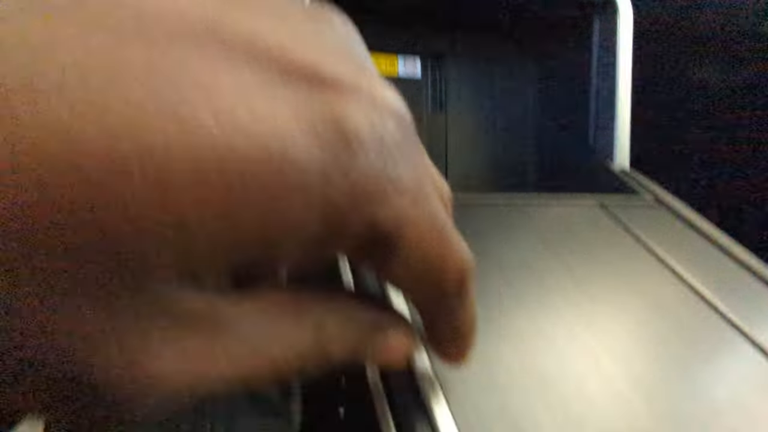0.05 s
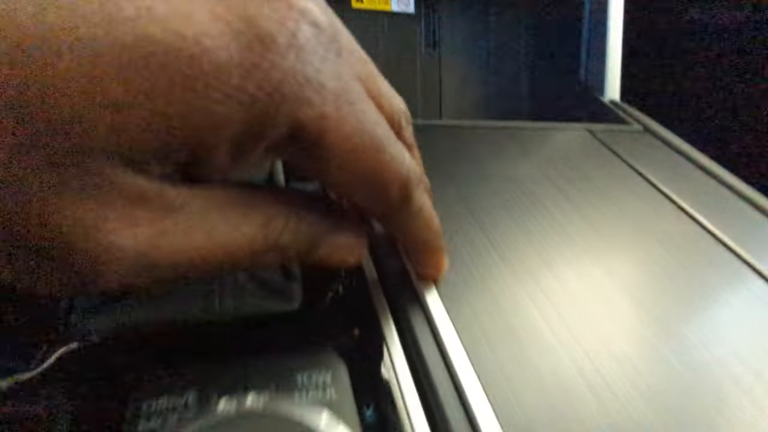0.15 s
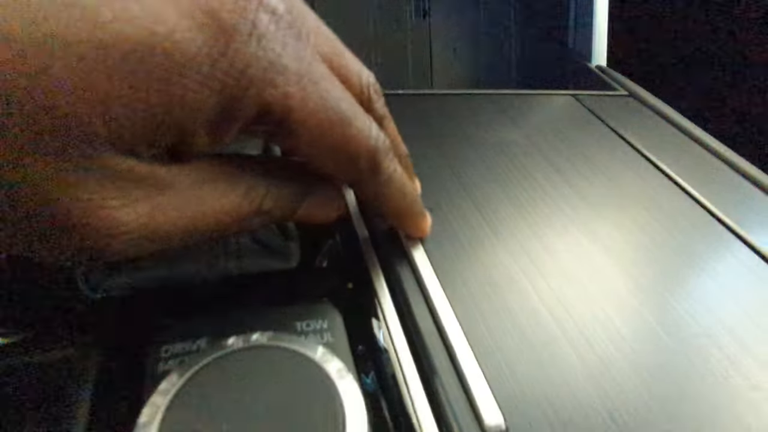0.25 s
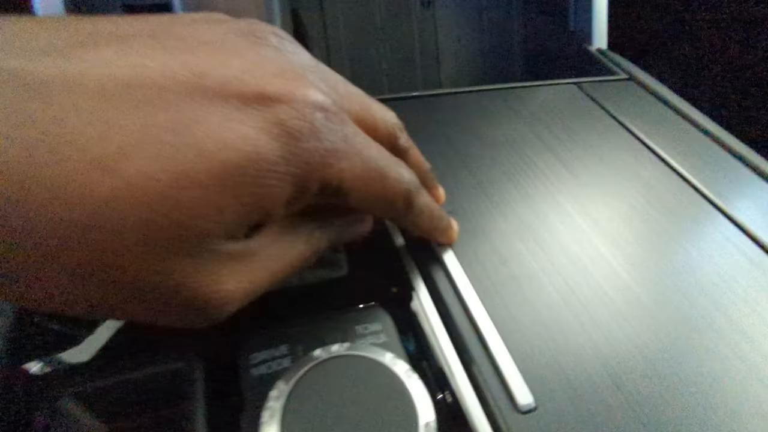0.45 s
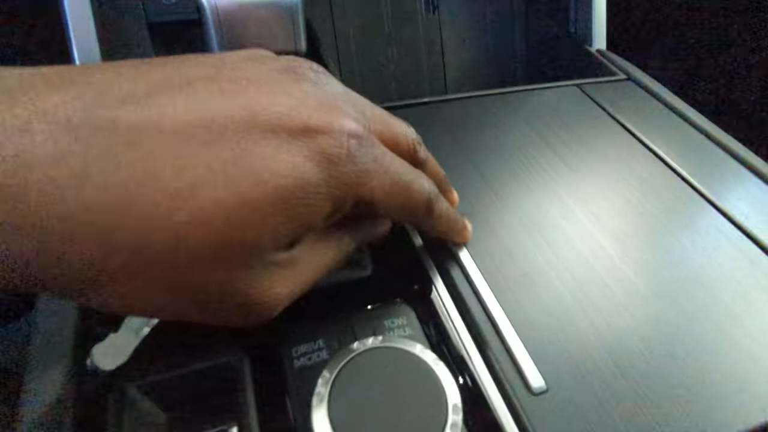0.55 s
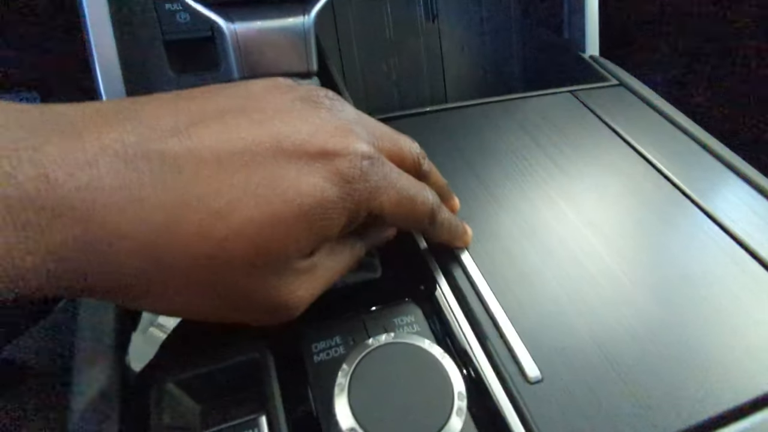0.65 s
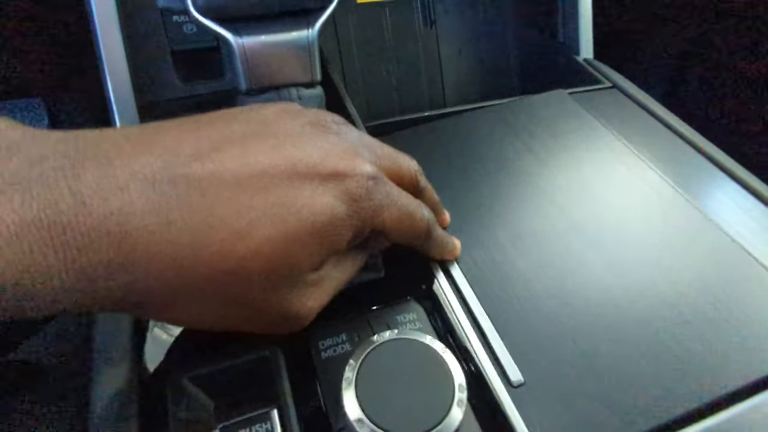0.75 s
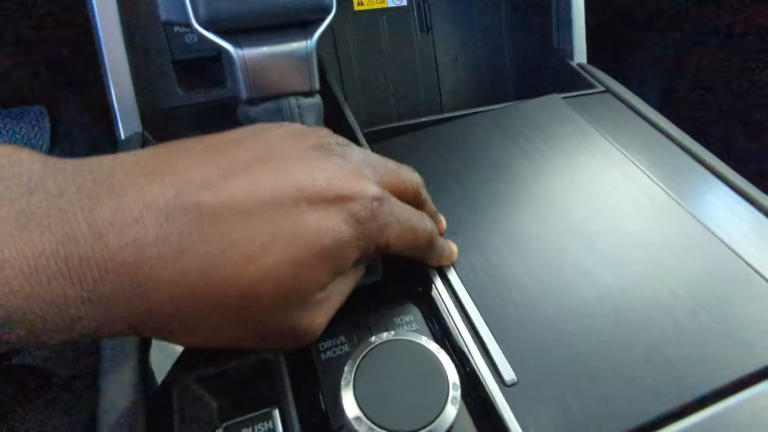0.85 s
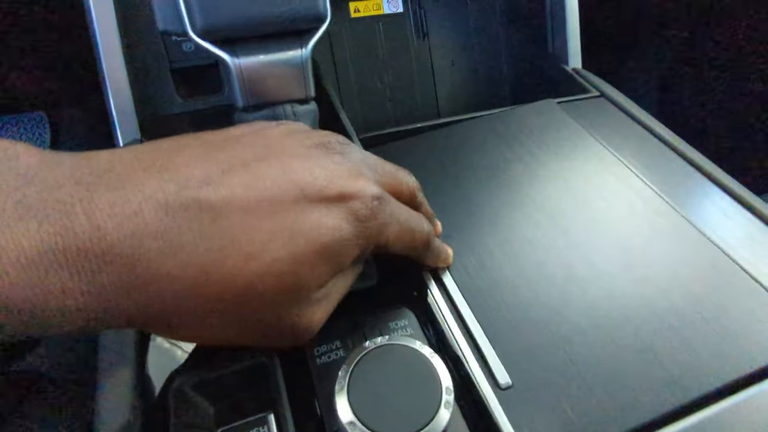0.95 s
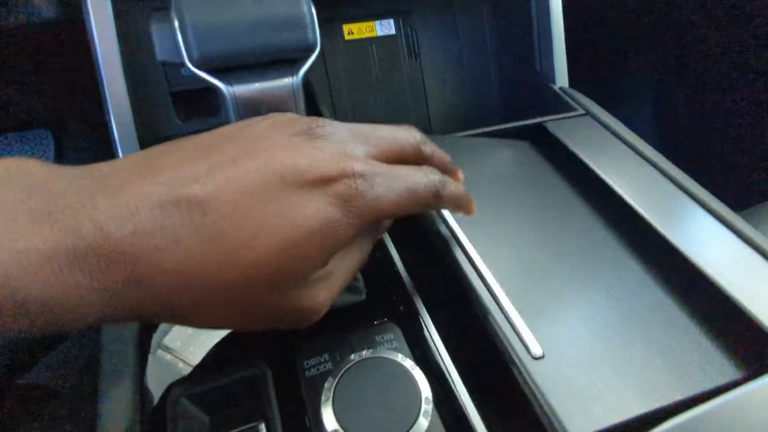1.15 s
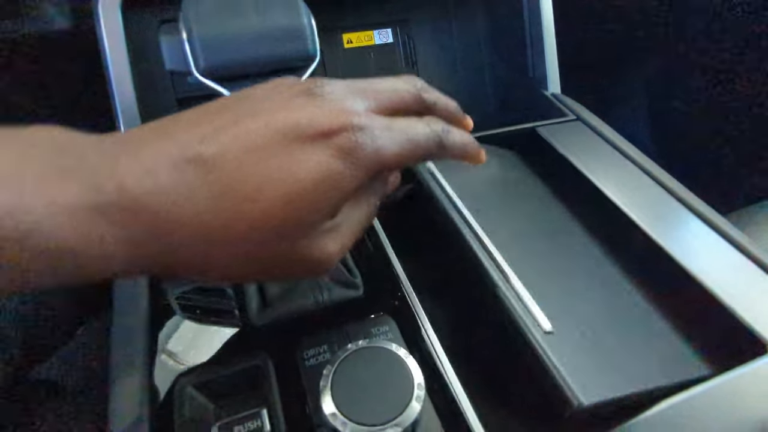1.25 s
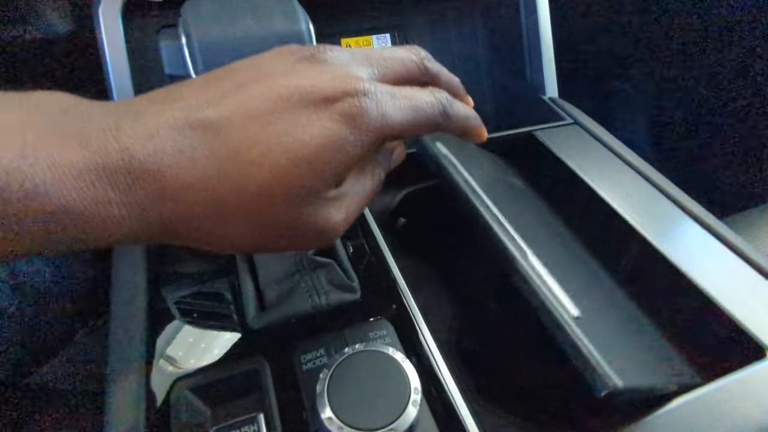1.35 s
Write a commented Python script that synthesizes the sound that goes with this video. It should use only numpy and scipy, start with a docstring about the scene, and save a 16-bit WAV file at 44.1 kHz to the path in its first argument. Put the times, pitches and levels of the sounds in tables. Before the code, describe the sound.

A plastic console cover is pushed until it lets go with a hollow clack and glides open. Before that, a hand brushes it and sharp knocks hit the microphone on the right. Close, inside a parked car with faint ventilation.

```python
"""A plastic console cover, heard from close by inside a parked car: a hand brushes over it and pushes
until the catch lets go with a hollow clack, then the cover glides open on a grain of tiny slips.
Before the clack, something knocks and clicks right at the right-hand microphone, probably the grip
on the recorder, and the cabin rings briefly. Ventilation hums faintly behind it all."""
import sys
import numpy as np
from scipy import signal
from scipy.fft import rfft, irfft
from scipy.io import wavfile
from scipy.ndimage import uniform_filter1d

SR = 44100
rng = np.random.default_rng(int(sys.argv[2]) if len(sys.argv) > 2 else 0)


def dump_mix(stems):
    """Bounce the given channels to the path in sys.argv[1] as a 16-bit WAV at rate SR."""
    frames = np.atleast_2d(stems).T  # one column per channel
    limited = np.clip(frames, -1, 1)  # hard clip at full scale
    pcm = np.round(limited * 32767).astype(np.int16)
    wavfile.write(sys.argv[1], SR, pcm)


N = 61739


def catch():
    """The catch lets go: quick blows rattle the cover and boom in the console, then the cover lurches."""
    # catch and cover hitting their stops: start_s, body_db, rattle_db
    blows = [(0.7829, -55.5, -46), (0.7927, -39, -47.5), (.8080, -48.5, -42.5), (0.8133, -45, -47.5),
             (0.8159, -45.5, -74), (0.827, -49, -63), (0.839, -48.5, -57.5)]
    # hollow body of the console: pitch_hz, gain_db, t60_s
    body_modes = [(184.7, 3, 0.11), (207, 10, 0.066), (254, -3.5, 0.11), (340, -6, 0.11),
                  (642, -6.5, 0.076), (890, -13, 0.063)]
    # spectrum of the rattling cover: frequency_hz, gain_db
    rattle_colour = [(150, -0.5), (400, 3.5), (1000, -0.5), (1500, -10), (2400, -6), (3600, -17.5),
                     (5000, -24), (8500, -47), (15000, -50)]
    # the freed cover lurching on its runners: pitch_hz, level_db, t60_s
    lurch_modes = [(59.6, -43, 0.15), (100, -39, .085), (130, -46, .08)]
    # bright tick as the catch slips: frequency_hz, gain_db
    snap_colour = [(1000, -1), (3000, 2), (5000, -2.5), (7000, -1), (9000, -3.5), (12000, -5), (16000, -3)]
    snap_s, lurch_s = 0.8118, 0.823
    body_attack_s, cover_attack_s = 0.0043, 0.00042
    clack, rattle = np.zeros(N), noise(rattle_colour)[0]
    for start, body_db, rattle_db in blows:
        clack += undb(body_db) * rise(start, body_attack_s) * ring(start, body_modes)
        clack += undb(rattle_db) * rise(start, cover_attack_s) * rattle * fade(start, t60=0.06)
    clack += rise(lurch_s, body_attack_s) * ring(lurch_s, lurch_modes)
    snap = undb(-45) * noise(snap_colour) * rise(snap_s, cover_attack_s) * fade(snap_s, t60=0.042)
    return clack * undb([[-2.2], [0]]) + snap  # the clack sits a little to the right


def brush():
    """Skin on finely textured plastic: a high, fluttering hiss, a little to the left."""
    # the hand's stroke over the cover: time_s, level_db
    stroke = [(0, -57.5), (.03, -51.5), (.084, -45.5), (.15, -50), (.206, -49), (.25, -46.5), (.29, -48.5),
              (.33, -54), (.384, -73), (.584, -79.5), (.63, -62.5), (.692, -60.5), (.79, -62), (.86, -66),
              (.96, -79), (1.214, -88), (1.33, -75), (1.4, -85)]
    # spectrum of the hiss: frequency_hz, gain_db
    hiss_colour = [(500, -35), (2000, -12), (3500, -9), (5000, -13), (6700, -3.5), (8200, -7.5),
                   (10000, -2), (12300, 0), (14000, 0.5), (16000, -2.5)]
    pan = undb([[1.5], [-1.5]])
    return pan * noise(hiss_colour) * curve(stroke) * undb(2 * walk(rate_hz=70.7))


def slide():
    """Dense tiny slips of the sliding surfaces sound through the cover."""
    # cover and hand sliding: time_s, level_db
    travel = [(0, -55.5), (.035, -47.5), (.07, -57), (.16, -56), (.22, -57), (.33, -56.5), (.42, -65),
              (.58, -61), (.65, -57), (.76, -57.5), (.92, -56), (1.0, -66.5), (1.05, -64.5), (1.13, -59.5),
              (1.2, -64), (1.26, -69), (1.4, -90)]
    # spectrum of the slips through the cover: frequency_hz, gain_db
    slip_colour = [(80, 6.5), (250, -1), (550, -3.5), (950, 0.5), (1300, -3), (2100, -6), (3200, -12),
                   (5000, -24.5), (9000, -30), (16000, -63)]
    slips_per_s, spread_db = 2500, 2.5
    slips = (rng.random((2, N)) < slips_per_s / SR) * rng.standard_normal((2, N))
    slips *= undb(spread_db * rng.standard_normal((2, N)))
    return colour(slips, slip_colour) * curve(travel)


def rubs():
    """Brief rubs each sound one narrow resonance of the cover."""
    # rubs on the cover: centre_s, width_s, pitch_hz, level_db
    touches = [(0.033, 0.016, 610, -55), (1.115, 0.024, 810, -64.5), (1.194, 0.019, 507, -59)]
    bandwidth_hz = 65
    out = np.zeros((2, N))
    for centre, width, hz, db in touches:
        edges_hz = [hz - bandwidth_hz / 2, hz + bandwidth_hz / 2]
        band = signal.butter(1, edges_hz, "band", fs=SR, output="sos")
        rub = signal.sosfilt(band, rng.standard_normal((2, N)))
        out += undb(db) * swell(centre, width) * rub / rub.std()
    return out


def knocks():
    """Heavily damped thuds of a cycle or two, each with a little contact grit."""
    # knocks at the right microphone: start_s, level_db, pitch_hz, swell_cycles, grit_gain_db
    hits = [(0.227, -18, 422, 0.42, -10.5), (0.2321, -11, 193, 0.37, -25.5), (0.2491, -13.5, 483, 0.71, -6),
            (.2521, -14, 900, 0.44, -23.5), (.2572, -23.5, 706, 0.7, -12.5), (0.3539, -33.5, 820, 0.34, -5),
            (0.6236, -32.5, 1270, 0.57, -11), (0.624, -34, 417, 0.4, -16), (.7000, -44, 1100, 0.37, -1),
            (0.7119, -32.5, 360, 0.28, -15), (0.7139, -36, 780, 0.37, -15)]
    # spectrum of the contact grit: frequency_hz, gain_db
    grit_colour = [(60, -6), (150, -12), (500, 1.5), (1400, -1.5), (2400, -6.5), (3200, -15), (5000, -22),
                   (9000, -50), (16000, -58)]
    out, grit = np.zeros(N), noise(grit_colour)[0]
    for start, db, hz, swell_cycles, grit_db in hits:
        cycles = clock(start) * hz
        envelope = cycles / swell_cycles * np.exp(1 - cycles / swell_cycles)
        thud = envelope * np.sin(2 * np.pi * cycles)
        thud -= envelope * thud.sum() / envelope.sum()  # the air returns to rest
        contact = undb(grit_db) * grit * rise(start, 0.00045) * fade(start, t60=0.024)
        out += undb(db) * (thud + contact)
    return out


def clicks():
    """Hard contacts: a short crack and the brief ring of stiff plastic."""
    # sharp clicks among the knocks: start_s, gain_db, crack_gain_db
    contacts = [(0.227, -40, -6), (0.2401, -23, -26), (0.2514, -28, -4.5), (0.2515, -17.5, -1.5),
                (0.2543, -26.5, -10), (0.2588, -27, -6)]
    # resonances of the stiff plastic: pitch_hz, gain_db, t60_s
    plastic_modes = [(1580, -24.5, 0.054), (2580, -10.5, 0.04), (3300, -25, 0.033), (4390, 3.5, 0.0065),
                     (4820, 4.5, 0.0061), (6620, -12, 0.024), (6700, -31, 0.0099)]
    # spectrum of the crack: frequency_hz, gain_db
    crack_colour = [(300, -19), (1500, 5), (2500, -27), (3300, 7), (4500, 8), (6500, 6), (8000, -8),
                    (11000, -9), (16000, -19)]
    out, crack_noise = np.zeros(N), noise(crack_colour)[0]
    for start, db, crack_db in contacts:
        crack = undb(crack_db) * crack_noise * fade(start, t60=0.012)
        out += undb(db) * rise(start, 0.00011) * (ring(start, plastic_modes) + crack) / 2
    return out


def handling():
    """Knocks, clicks and grip rumble reach the right microphone directly; both sides hear the cabin."""
    # ring of the cabin after a knock: frequency_hz, gain_db
    tail_colour = [(40, -13), (80, -5), (200, -0.5), (400, -9.5), (1000, -11), (2500, 4), (4400, 4.5),
                   (5400, 4), (6500, -3), (9000, -11.5), (16000, -10)]
    # dull rumble as the grip shifts: frequency_hz, gain_db
    grip_colour = [(25, -14), (60, 21), (130, -9), (260, -28), (500, -32), (1500, -41), (8000, -65)]
    direct = knocks() + clicks()
    response = noise(tail_colour) * fade(0, t60=0.15)
    response /= np.sqrt(np.sum(response ** 2, axis=1, keepdims=True))
    out = signal.fftconvolve(direct[None], response, axes=1)[:, :N] * undb([[-24.5], [-16.5]])
    rumble = undb(-46) * noise(grip_colour)[0] * swell(centre_s=0.2, width_s=0.014)
    out[1] += direct + rumble
    # the heaviest knock sets off a low cabin resonance
    boom_s, boom_hz, boom_db, boom_t60_s = 0.2321, 195, -59.5, 1
    return out + ring(boom_s, [(boom_hz, boom_db, boom_t60_s)])


def reflections(x):
    """Close surfaces add early echoes that colour the sound at about the same level."""
    # echoes off the dashboard and seats: delay_s, gain_db
    paths = [(.0013, -26.5), (.0029, -14), (.0047, -12)]
    echoes = sum(undb(db) * np.pad(x, ((0, 0), (int(delay * SR), 0)))[:, :N] for delay, db in paths)
    return (x + echoes) / np.sqrt(1 + sum(undb(db) ** 2 for _, db in paths))


def ventilation():
    """Soft air noise fills the cabin, with a wavering hum."""
    # spectrum of the air noise: frequency_hz, gain_db
    air_colour = [(20, -43), (35, -4), (58, 2), (85, -11), (130, 3), (190, -6.5), (260, -7), (450, -9),
                  (850, -5), (1250, -10.5), (2000, -8.5), (3000, -20.5), (5000, -31.5), (8000, -37.5),
                  (16000, -52)]
    hum_hz = 325 * (1 + 0.0035 * walk(rate_hz=11))
    hum = np.sqrt(2) * np.sin(2 * np.pi * np.cumsum(hum_hz) / SR)
    air = undb(-59.5 + 0.34 * walk(rate_hz=7.7)) * noise(air_colour)
    return air + undb(-68 + 0.94 * walk(rate_hz=7.7)) * hum


def undb(db):
    """Decibels to gain."""
    return 10 ** (np.asarray(db) / 20)


def clock(start=0):
    """Seconds since start, zero before it."""
    return np.maximum(np.arange(N) / SR - start, 0)


def curve(points):
    """Gain along points of time_s, level_db."""
    return undb(np.interp(clock(), *np.array(points).T))


def rise(start, attack_s):
    """Smooth attack from zero to one."""
    return 1 - np.exp(-clock(start) / attack_s)


def fade(start, t60):
    """Sudden start, then a decay of 60 dB every t60 seconds."""
    t = clock(start)
    return (t > 0) * np.exp(-np.log(1000) * t / t60)


def swell(centre_s, width_s):
    """Bell-shaped rise and fall."""
    return np.exp(-.5 * ((clock() - centre_s) / width_s) ** 2)


def colour(x, points):
    """Shape the spectrum by points of frequency_hz, gain_db; the result has rms 1."""
    hz, db = np.array(points).T
    bin_hz = np.maximum(np.arange(N // 2 + 1) * SR / N, 1)
    shaped = irfft(rfft(x) * undb(np.interp(np.log(bin_hz), np.log(hz), db)), N)
    return shaped / shaped.std()


def noise(points):
    """Coloured noise, unrelated left and right."""
    return colour(rng.standard_normal((2, N)), points)


def walk(rate_hz):
    """Smooth random wander with spread near 1."""
    step = max(int(SR / rate_hz), 1)
    return uniform_filter1d(np.repeat(rng.standard_normal(N // step + 1), step), step)[:N]


def ring(start, modes):
    """Decaying modes struck at one moment."""
    t = clock(start)
    return sum(undb(db) * fade(start, t60) * np.sin(2 * np.pi * hz * t) for hz, db, t60 in modes)


def scene():
    """Everything that reaches the stereo pair above the console."""
    return handling() + catch() + rubs() + reflections(brush() + slide()) + ventilation()


def record(dry):
    """The recorder cuts the deepest bass and the top of the treble."""
    low_cut_hz, top_hz = 46, 15850
    dry = signal.sosfilt(signal.butter(2, low_cut_hz, "high", fs=SR, output="sos"), dry)
    return signal.sosfilt(signal.ellip(10, .2, 70, top_hz, fs=SR, output="sos"), dry)


dry = scene()
out = record(dry)
dump_mix(out)
```